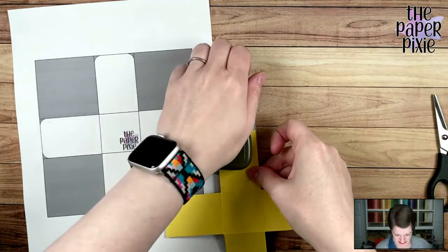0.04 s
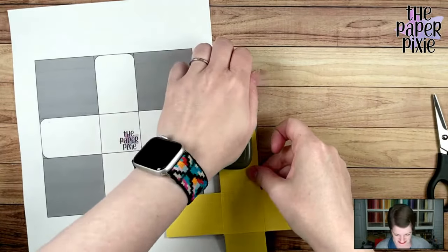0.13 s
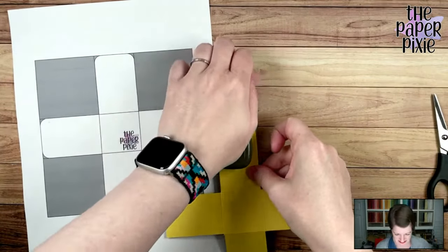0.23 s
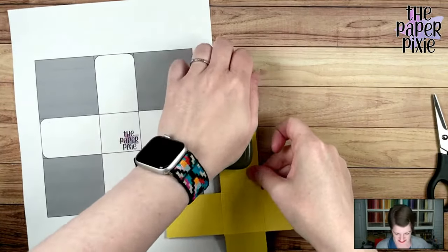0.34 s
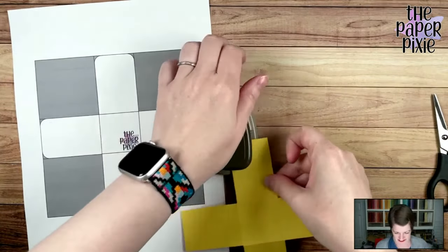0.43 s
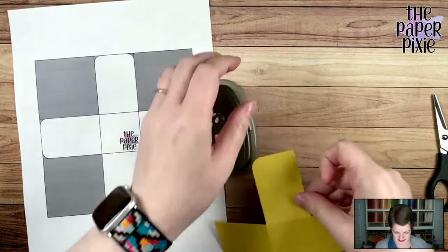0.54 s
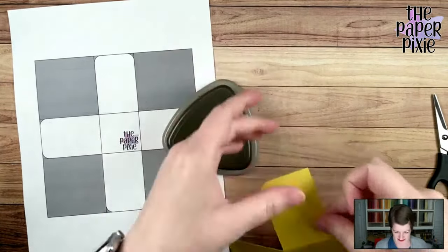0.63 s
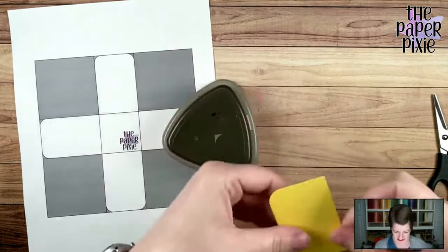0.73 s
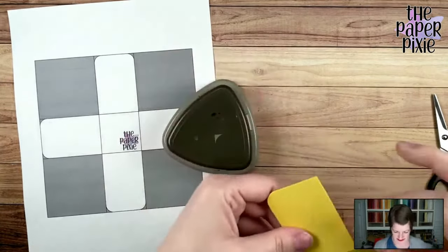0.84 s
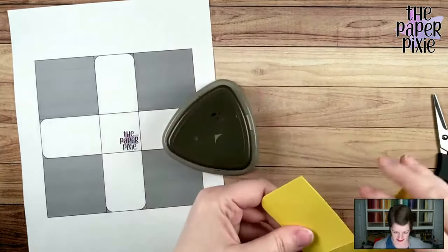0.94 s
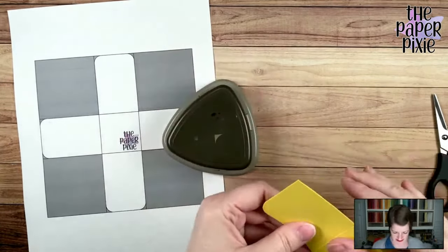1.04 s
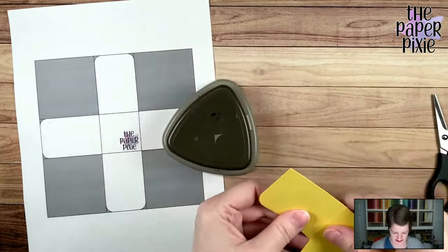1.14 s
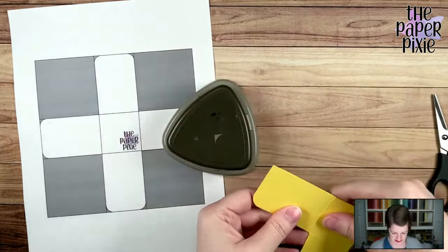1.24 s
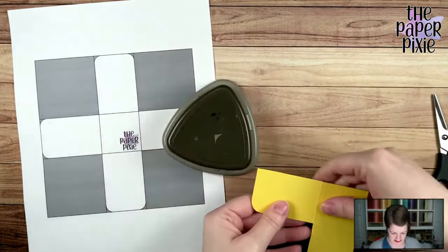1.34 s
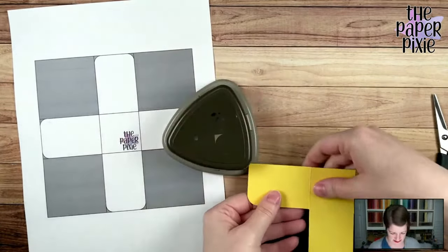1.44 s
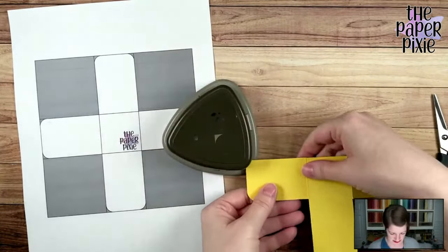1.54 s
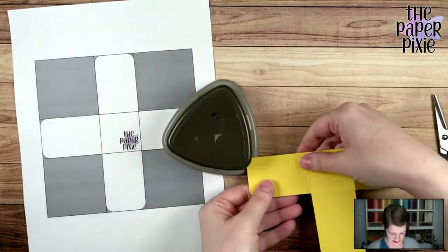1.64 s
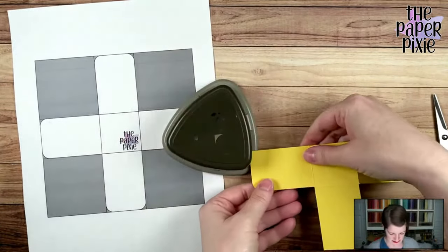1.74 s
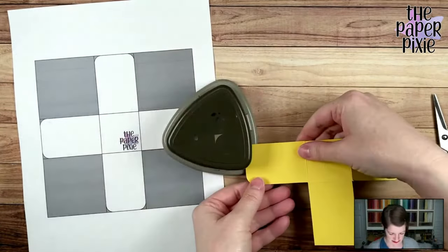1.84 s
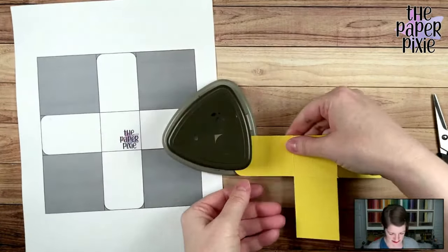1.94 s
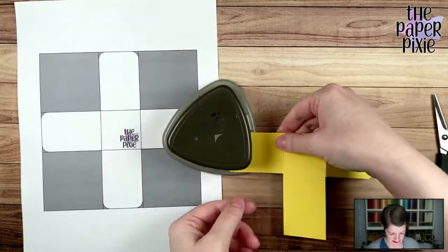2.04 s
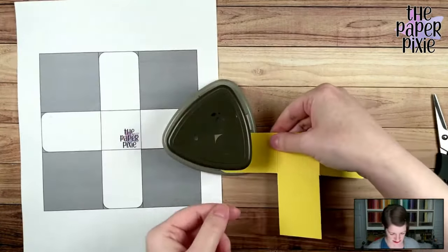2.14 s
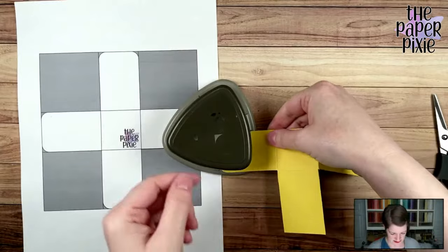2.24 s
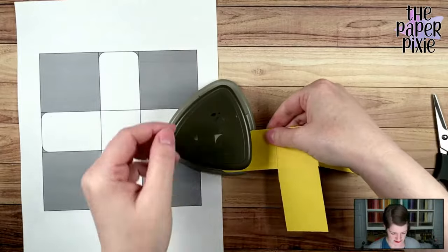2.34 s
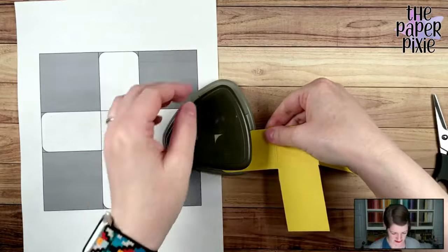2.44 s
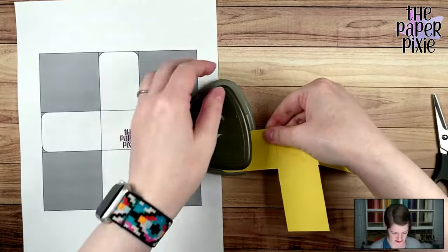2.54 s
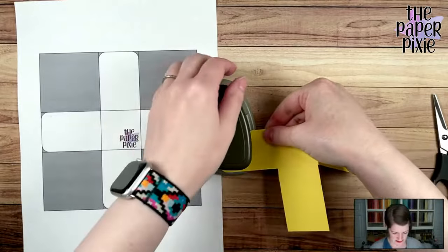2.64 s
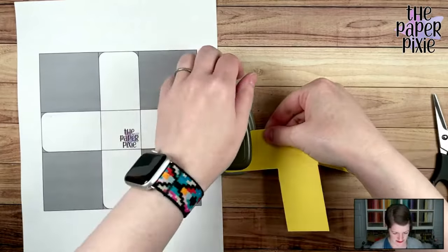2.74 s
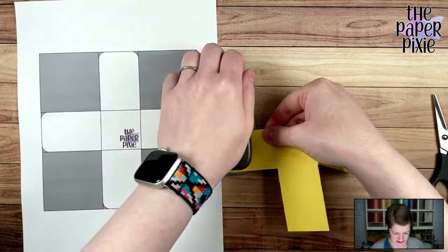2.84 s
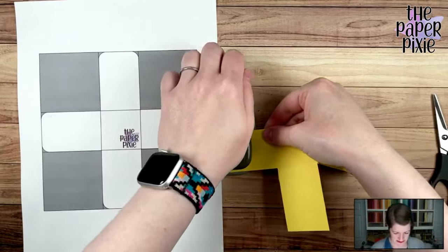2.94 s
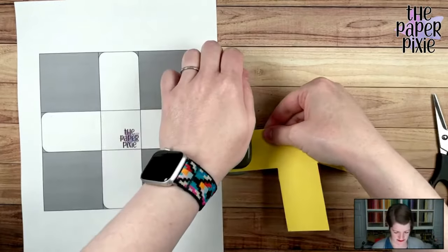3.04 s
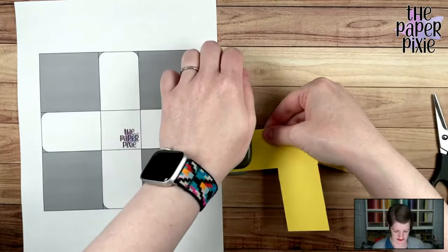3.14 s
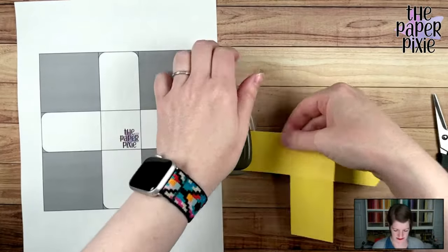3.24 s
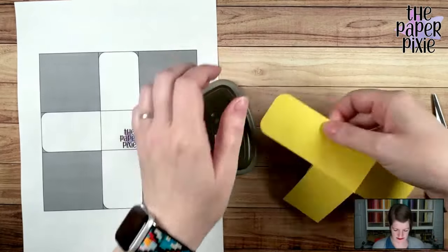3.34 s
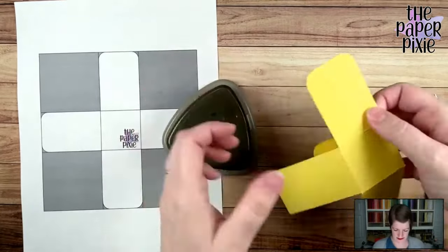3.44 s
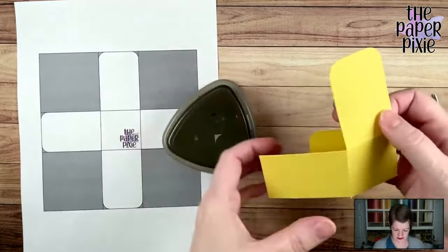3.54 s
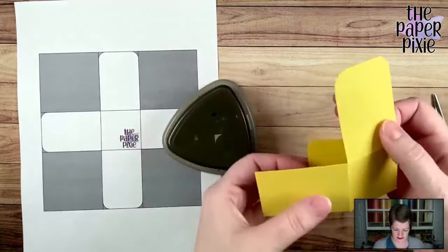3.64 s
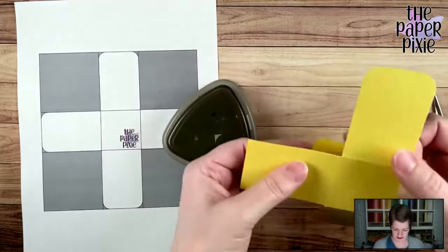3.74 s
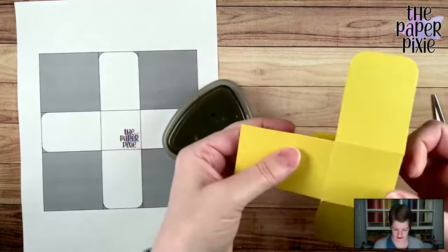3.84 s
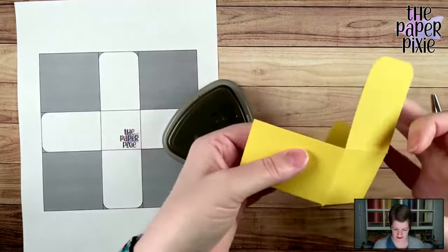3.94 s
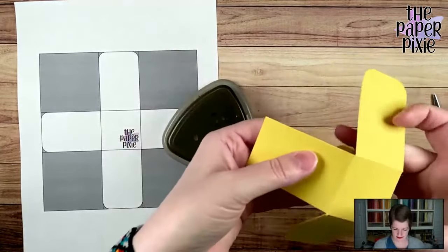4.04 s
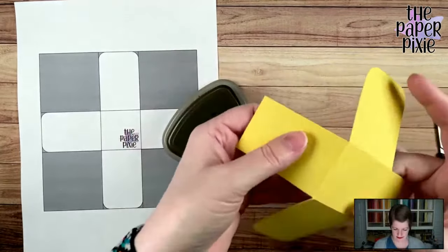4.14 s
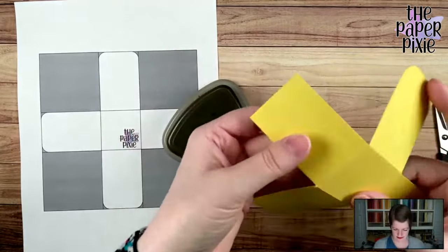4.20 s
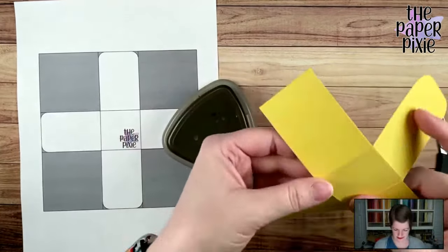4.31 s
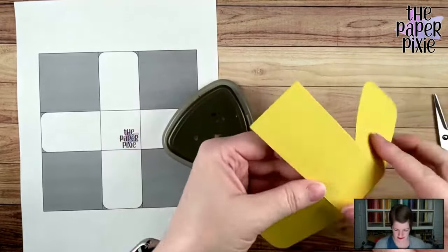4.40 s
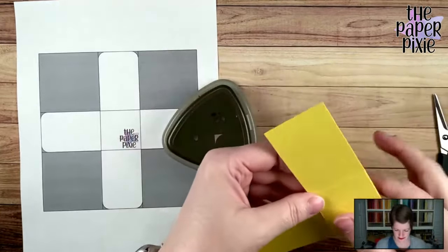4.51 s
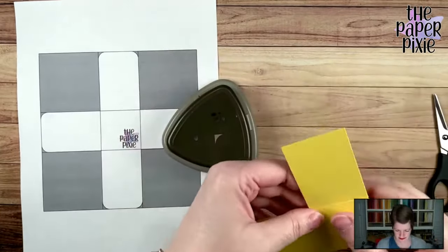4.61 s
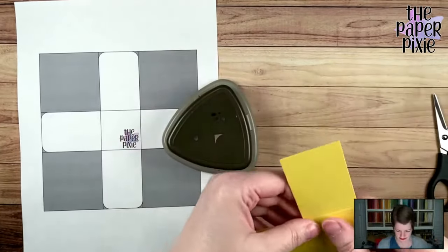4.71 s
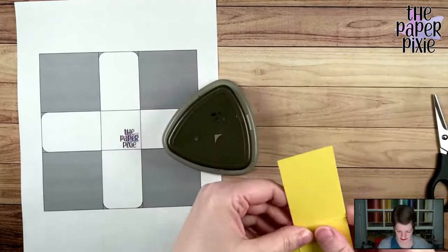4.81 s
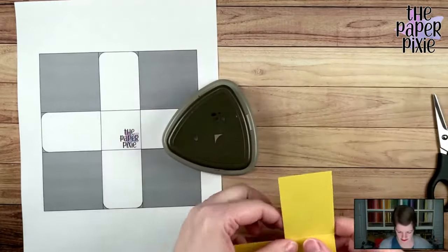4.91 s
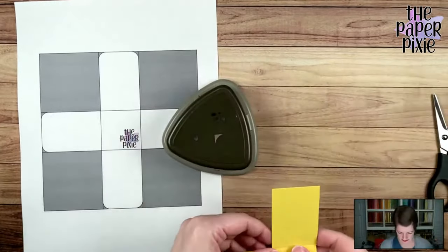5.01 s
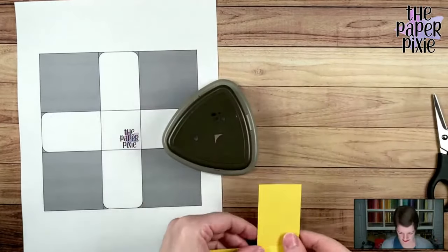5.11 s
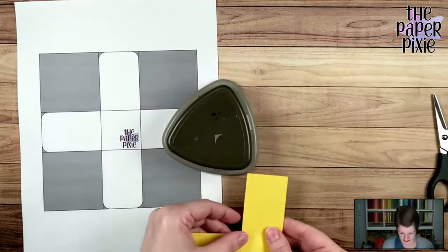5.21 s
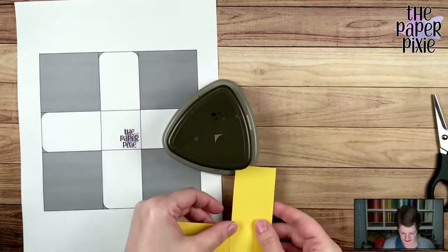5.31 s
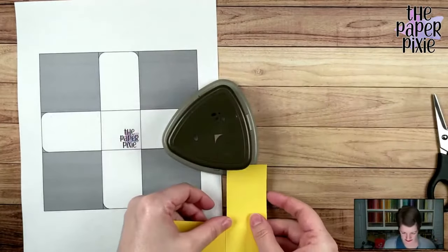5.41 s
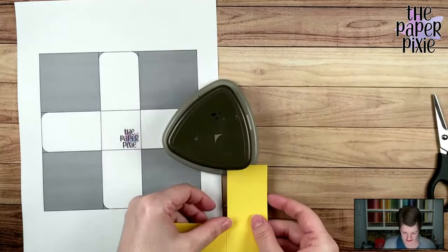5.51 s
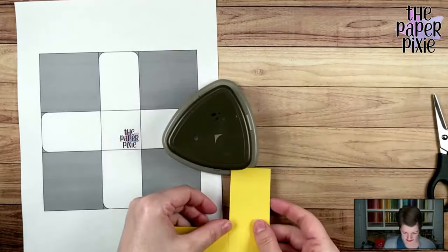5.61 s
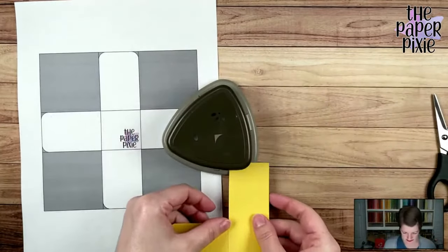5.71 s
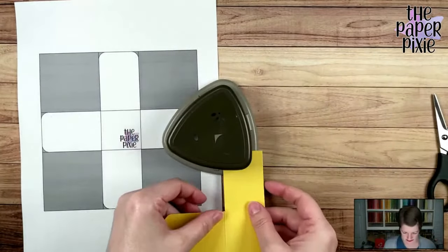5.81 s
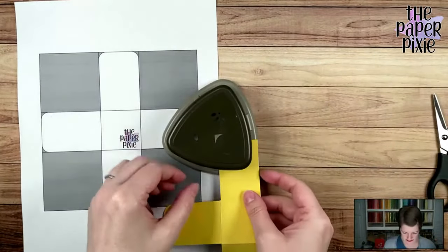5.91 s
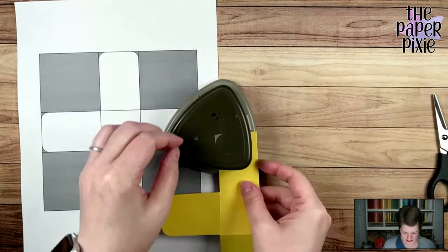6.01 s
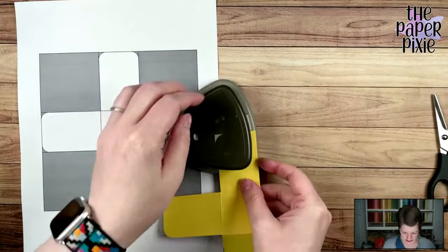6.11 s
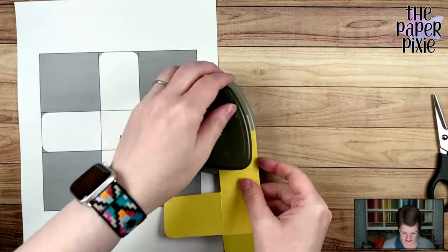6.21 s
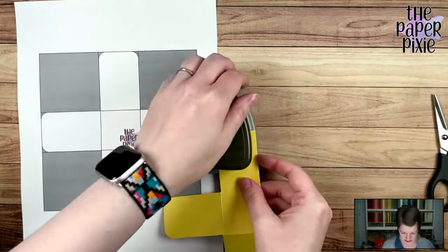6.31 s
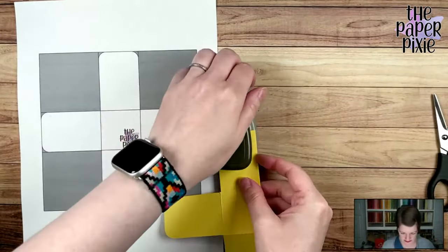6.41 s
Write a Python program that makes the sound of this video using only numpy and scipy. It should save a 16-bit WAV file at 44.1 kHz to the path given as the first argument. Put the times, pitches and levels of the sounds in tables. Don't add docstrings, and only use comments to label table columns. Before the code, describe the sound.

Two heavy, crunching punch presses thud into a wooden table about three seconds apart, with stiff card tapping, flicking and sliding between and after.

```python
import sys
import numpy as np
from scipy import signal
from scipy.fft import rfft, irfft
from scipy.io import wavfile
from scipy.ndimage import uniform_filter1d

SR = 44100
rng = np.random.default_rng(int(sys.argv[2]) if len(sys.argv) > 2 else 0)


def volts_from_decibels(level):
    exponent = np.asarray(level, float) / 20
    return 10 ** exponent


def put_to_file(sound):
    columns = np.atleast_2d(sound).T
    safe = np.clip(columns, -1, 1)
    whole_steps = np.round(safe * 32767)
    wavfile.write(sys.argv[1], SR, whole_steps.astype(np.int16))


N = 284709

# f/Hz, level per hertz/dB
HUSH_SPECTRUM = [(12, -33.5), (20, -6.5), (113, -7), (210, -12), (241, -7.5), (328, -11.5), (485, -13),
                 (558, -12.5), (738, -28.5), (1570, -22.5), (4060, -28.5), (12800, -29), (16000, -30)]
# f/Hz, T60/s
ROOM_DECAY = [(100, 0.23), (400, 0.35), (1200, 0.31), (3500, 0.31), (8000, 0.29), (15000, 0.077)]
# f/Hz, level/dB
ROOM_COLOUR = [(200, 7.5), (1500, -2), (4000, -4.5), (9000, -2.5), (15000, -6.5)]
# t of widest swing/s, level/dB
SWAYS = [(.078, -44), (.192, -37.5), (.4, -48), (.74, -52), (1.1, -68), (1.5, -74), (2.85, -49),
         (3.008, -38), (3.22, -53.5), (3.382, -59.5), (3.574, -56), (3.784, -65), (4.06, -71.5)]
# t/s, effort level/dB, stiffness (shift towards fizz)/dB
CARD_EFFORT = [(0, -78.5, -14), (0.602, -75.5, -1), (.8, -67.5, -8), (1.004, -63.5, 0), (1.231, -69.5, 5.5),
               (1.31, -75, 2.5), (1.7, -70, -8), (1.936, -63.5, -15), (2.326, -74, -8), (2.8, -84.5, -1.5),
               (3.672, -67.5, 1), (3.9, -71, -9), (4.157, -65, 1.5), (4.71, -69, -5), (5.22, -66.5, -3.5),
               (5.5, -74.5, -6), (5.701, -67, -5.5), (6.45, -80, -5)]
# start t/s, end t/s, level/dB
LEVER_RETURNS = [
    (0.21, .37, -57),
    (3.0, 3.18, -54),
]
# t of most weight/s, level/dB, fizz share/dB
GRINDS = [
    (.12, -44.5, -10.5),
    (3.04, -47, -27.5),
]
# start t/s, end t/s, level/dB, f/Hz
STROKES = [(.838, .9, -65, 3000), (.839, .888, -66, 1060), (.965, 1.014, -67, 1120),
           (1.09, 1.126, -65, 1210), (1.812, 1.884, -64, 3170), (1.819, 1.903, -71, 522),
           (1.882, 2.035, -77, 3830), (3.812, 3.92, -72.5, 1970), (4.759, 4.82, -77, 644),
           (4.858, 4.95, -68, 6300), (5.194, 5.245, -70, 3700), (5.24, 5.27, -69, 3170),
           (5.305, 5.34, -69, 3040), (5.637, 5.934, -66, 2800), (5.64, 5.853, -69, 3800),
           (5.637, 5.76, -73, 6040), (5.76, 5.845, -69, 9400)]
# start t/s, end t/s, level/dB, f/Hz
RASPS = [(.835, .898, -56, 5370), (5.66, 5.87, -70.5, 860), (1.362, 1.482, -66.5, 7000),
         (1.767, 1.858, -64.5, 7500), (4.338, 4.38, -71, 9100), (4.856, 4.95, -66, 8800),
         (5.639, 5.86, -62, 2530), (5.789, 5.845, -63.5, 12500)]
# start t/s, end t/s, level/dB, f/Hz
SWEEPS = [(.96, 1.04, -61, 6000), (1.2, 1.29, -69, 7400), (3.025, 3.06, -44.5, 3410),
          (3.615, 3.66, -63, 8400), (3.68, 3.735, -66, 7000), (3.86, 3.92, -68.5, 6000),
          (3.96, 4.06, -57.5, 6700), (4.05, 4.2, -67, 6700), (4.64, 4.8, -59.5, 5000),
          (4.7, 4.78, -68, 8950), (5.36, 5.43, -71, 3020), (.61, .68, -64, 4000), (1.5, 1.59, -69, 5070)]
# t/s, peak level/dB, ring f/Hz, burst length/s
TAPS = [(.616, -56, 686, 0.0076), (.633, -43, 574, 0.0072), (1.089, -67, 1330, .0084),
        (1.212, -48, 745, 0.003), (1.517, -39, 1424, 0.0038), (3.454, -48, 2860, 0.018),
        (3.485, -39.5, 940, 0.0038), (3.747, -58, 1050, 0.0075), (3.997, -51, 1510, 0.007),
        (4.032, -50, 1580, 0.011), (4.231, -47, 1920, 0.024), (4.238, -46.5, 970, 0.014),
        (4.262, -44, 2610, 0.0077), (4.437, -44, 2560, 0.004), (4.748, -32.5, 1030, 0.0086),
        (4.759, -51, 766, 0.0067), (5.375, -48, 2770, 0.0077), (5.382, -36, 2020, 0.0076),
        (5.637, -50.5, 2940, .006), (5.648, -49, 2870, 0.0066), (6.108, -47.5, 2260, 0.014),
        (6.11, -49.5, 790, 0.0089), (6.126, -52, 2300, .0072)]
# t/s, peak level/dB, ring f/Hz
POPS = [(1.088, -52, 1130), (1.095, -41, 1180), (1.798, -47.5, 1190), (4.519, -50, 3420),
        (5.48, -56.5, 2640)]
# t/s, peak level/dB, ring f/Hz
FLICKS = [(.635, -41.5, 3440), (.838, -51, 6100), (1.095, -43.5, 3700), (1.517, -50, 5800),
          (1.797, -40.5, 3280), (3.486, -39.5, 2383), (3.615, -49.5, 3740), (4.238, -41.5, 2780),
          (4.749, -37.5, 5300), (5.384, -41, 2880)]
# f/Hz, level/dB, T60/s
TABLE_MODES = [(63.6, -6, .6), (93, -3, 0.16), (99.3, 0, 0.17), (119.8, -5.5, 0.17), (185.2, -4, 0.14),
               (212.5, -0.5, 0.081), (248, -11.5, 0.13), (315.5, -1, 0.12), (345, -14.5, 0.064),
               (397, -4.5, 0.09), (456, -4.5, 0.14), (600, 2.5, 0.069), (707, -5.5, 0.28)]
# t/s, peak level/dB, centre f of modes reached/Hz, damping factor
BLOWS = [(0.033, -26, 101, 0.49), (0.059, -25, 150, 2.7), (0.0703, -13.5, 300, 1.2),
         (0.0793, -19, 126, 2.1), (0.246, -32, 162, 1.7), (0.63, -47, 65, 3.6), (0.852, -46, 149, 1.1),
         (1.515, -47, 398, 2.1), (2.822, -33.5, 97, 0.16), (2.887, -5.5, 197, 1.67), (2.895, -21, 102, 1.4),
         (3.058, -29.5, 127, 1.5), (3.486, -53, 67, 1.4), (3.614, -50, 116, 2.9), (4.232, -58, 110, 0.81),
         (4.748, -47.5, 410, 1.3), (4.749, -52, 120, 2), (1.801, -57, 85, 1.1), (3.838, -50, 130, 0.9),
         (6.113, -51.5, 95.4, 1.1)]
# t/s, peak level/dB, centre f of modes reached/Hz, damping factor
REBOUNDS = [
    (0.0723, -12, 280, 1.9),
    (0.0953, -14, 174, 4.2),
    (2.864, -26, 150, 1.3),
    (2.871, -13.5, 270, 1.5),
]
# t/s, f/Hz, level/dB, T60/s
TRAY_RINGS = [
    (2.886, 248, -35.5, .56),
    (2.886, 248, -55, 1.5),
]
# t/s, peak level/dB, ring f/Hz, burst length/s
SNAPS = [(.0605, -26, 1460, 0.01), (.066, -23.5, 1330, 0.013), (.078, -18, 1910, 0.0088),
         (.085, -22, 700, 0.0088), (.092, -22.5, 1180, 0.011), (.1, -30, 800, 0.0053),
         (.331, -39.5, 2010, 0.0068), (.392, -28.5, 2110, 0.007), (.408, -39, 2170, .012),
         (2.82, -42.5, 1220, 0.014), (2.865, -35.5, 980, 0.008), (2.8845, -16.5, 1180, .0057),
         (2.899, -50, 1400, .0027), (2.903, -21, 810, 0.014), (3.058, -45, 1980, 0.0096),
         (3.064, -32.5, 875, 0.014), (3.186, -37, 1210, 0.0039)]
# t/s, peak level/dB, ring f/Hz, burst length/s
KNOCKS = [(.019, -41.5, 750, 0.012), (.033, -41, 704, 0.0061), (.243, -27, 792, .0093),
          (.251, -31, 2260, 0.013), (.291, -54, 790, 0.0076), (.394, -40, 2034, .0063),
          (2.872, -24, 1260, 0.012), (2.893, -24, 1220, 0.0081), (3.055, -29.5, 2320, 0.0092),
          (3.074, -55, 2000, 0.0099)]
# t/s, peak level/dB, ring f/Hz, burst length/s
TICKS = [(.061, -40, 9500, .006), (2.817, -48, 5940, 0.0082), (2.8695, -25.5, 3750, 0.012),
         (2.874, -17, 3320, 0.004), (2.898, -43, 5600, 0.0029), (2.912, -41, 3270, .028),
         (2.94, -40, 3040, 0.023), (3.024, -38, 4650, .0056), (3.138, -37, 4500, 0.0078),
         (3.148, -38, 4620, 0.032), (3.187, -36, 4000, 0.0079)]
# t/s, peak level/dB, ring f/Hz
PINGS = [
    (.0782, -23.5, 6200),
    (.392, -35, 6260),
    (2.884, -23.5, 8900),
    (3.042, -46, 3700),
]


def evened(x):
    return x / np.sqrt(np.mean(x ** 2) + 1e-20)


def read(points, hz):
    f, value = np.transpose(points)
    return np.interp(np.log(hz + 1), np.log(f + 1), value)


def add(mix, s, sound):
    part = mix[max(round(s * SR), 0):][:len(sound)]
    part += sound[:len(part)]


def band(x, lo_hz, hi_hz):
    sos = signal.butter(2, [lo_hz, min(hi_hz, SR / 2.2)], "band", fs=SR, output="sos")
    return signal.sosfilt(sos, x)


def resonate(x, hz, width):
    turn = np.exp(2j * np.pi * np.cumsum(hz * np.ones(len(x))) / SR)
    r = np.exp(-np.pi * width / SR)
    return 2 * (turn * signal.lfilter([1 - r], [1, -r], x / turn)).real


def swell(start, end, db, rise_db_per_s, fall_db_per_s):
    t = np.arange(N) / SR
    before, after = np.maximum(start - t, 0), np.maximum(t - end, 0)
    return volts_from_decibels(db - rise_db_per_s * before - fall_db_per_s * after)


def hush():
    hz = np.fft.rfftfreq(N, 1 / SR)
    spectrum = rfft(rng.standard_normal(N)) * volts_from_decibels(read(HUSH_SPECTRUM, hz))
    return volts_from_decibels(-70) * evened(irfft(spectrum, N))


def room(x):
    echoes = np.zeros(SR // 2)
    at = np.arange(120, len(echoes) - 20, 20)
    echoes[at + rng.integers(0, 20, len(at))] = rng.choice([-1., 1.], len(at))
    hz, t, z = signal.stft(echoes, SR, nperseg=256)
    z *= volts_from_decibels(read(ROOM_COLOUR, hz)[:, None] - 60 * t / read(ROOM_DECAY, hz)[:, None])
    tail = signal.istft(z, SR, nperseg=256)[1]
    early_power = np.sum(echoes[:SR // 40] ** 2)
    return signal.fftconvolve(x, tail / np.sqrt(early_power))[:N]


def sway():
    level = sum(swell(s, s, db, rise_db_per_s=257, fall_db_per_s=85.5) for s, db in SWAYS)
    return np.sqrt(2) * level * np.sin(2 * np.pi * 26.4 * np.arange(N) / SR)


def patchy(x, patchy_db):
    z = signal.stft(x, nperseg=512, noverlap=384)[2]
    patches = uniform_filter1d(rng.standard_normal(z.shape), size=9, axis=0)
    patches = uniform_filter1d(patches, size=14, axis=1)
    return signal.istft(z * volts_from_decibels(patchy_db * evened(patches)), nperseg=512, noverlap=384)[1][:N]


def lever_gain():
    return sum(swell(*row, rise_db_per_s=101, fall_db_per_s=209) for row in LEVER_RETURNS)


def grind_gains():
    dull, fizz = np.zeros((2, N))
    for s, db, fizz_db in GRINDS:
        gain = swell(s, s, db, rise_db_per_s=127.5, fall_db_per_s=73.5)
        dull += gain
        fizz += volts_from_decibels(fizz_db) * gain
    return dull, fizz


def rubbing():
    s, *columns = np.transpose(CARD_EFFORT)
    effort_db, stiff_db = (np.interp(np.arange(N) / SR, s, c) for c in columns)
    lever = lever_gain()
    grind, grind_fizz = grind_gains()
    sheet_gain = volts_from_decibels(effort_db) + lever
    fizz_gain = volts_from_decibels(effort_db + stiff_db) + volts_from_decibels(-14) * lever + grind_fizz
    drag_gain = volts_from_decibels(-72.5 + 0.5 * (effort_db - effort_db.mean())) + grind
    grains = rng.standard_normal((3, N)) * volts_from_decibels(1.74 * rng.exponential(1, N))
    rub = volts_from_decibels(-2.5) * sheet_gain * evened(band(grains[0], 1300, 5200))
    rub += volts_from_decibels(-4.0) * fizz_gain * evened(band(grains[1], 5000, 9960))
    rub += volts_from_decibels(-1.7) * drag_gain * evened(band(grains[2], 160, 1256))
    return patchy(rub, 1.8)


def strokes(rows, width_share, soft):
    out = np.zeros(N)
    for start, end, db, hz in rows:
        width = width_share * hz
        noise, slips = rng.standard_normal((2, SR // 2))[:, :round((end - start) * SR)]
        stutter = volts_from_decibels(3.1 * evened(uniform_filter1d(slips, size=250)))
        scrape = resonate(noise * abs(noise) * stutter, hz, width)
        scrape = resonate(scrape, hz, 2 * width)
        stroke = signal.windows.tukey(len(scrape), soft) * np.linspace(1.15, .75, len(scrape))
        add(out, start, volts_from_decibels(db) * evened(scrape) * stroke)
    return out


def click(db, hz, bright_db, length, ring_db, sharp, spread):
    t = np.arange(4096) / SR
    length = np.clip(length, .001, .03)
    contacts = rng.standard_normal(len(t)) * volts_from_decibels(2.5 * rng.exponential(1, len(t)))
    contacts *= (t / length) ** 1.3 * np.exp(-4 * t / length)
    crack = band(contacts, hz / spread, hz * spread)
    edge = band(contacts, 4100, 12980)
    ring = resonate(contacts, hz, hz / sharp)
    body = evened(crack) + volts_from_decibels(ring_db) * evened(ring)
    return volts_from_decibels(db) * (body / abs(body).max() + volts_from_decibels(bright_db) * edge / abs(edge).max())


def clicks(rows, bright_db, ring_db, sharp, spread, length=None):
    out = np.zeros(N)
    for s, db, hz, *own in rows:
        add(out, s - .0005, click(db, hz, bright_db, length or own[0], ring_db, sharp, spread))
    return out


def card_contacts():
    card = clicks(TAPS, bright_db=-16, ring_db=-7, sharp=9, spread=2.2)
    card += clicks(POPS, bright_db=-9.5, ring_db=25, sharp=9, spread=2.2, length=.00527)
    card += clicks(FLICKS, bright_db=-11, ring_db=0, sharp=8, spread=1.7, length=.0052)
    card += strokes(STROKES, width_share=.09, soft=.3)
    card += strokes(RASPS, width_share=.6, soft=.3)
    card += strokes(SWEEPS, width_share=.6, soft=1)
    return card


def mode(hz, db, t60, seconds=0.92):
    t = np.arange(round(seconds * SR)) / SR
    return volts_from_decibels(db - 60 * t / max(t60, .01)) * np.sin(2 * np.pi * hz * t)


def thud(centre_hz, damping):
    out = 0
    for hz, db, t60 in TABLE_MODES:
        reach_db = -5.0 * np.log2(hz / centre_hz) ** 2
        out = out + mode(hz, db + reach_db, t60 / damping, .7)
    return out / abs(out).max()


def table_top():
    out = np.zeros(N)
    for rows, way in ((BLOWS, 1), (REBOUNDS, -1)):
        for s, db, centre_hz, damping in rows:
            add(out, s, way * volts_from_decibels(db) * thud(centre_hz, damping))
    for s, hz, db, t60 in TRAY_RINGS:
        add(out, s, mode(hz, db, t60))
    padded = uniform_filter1d(out, size=30)
    return band(padded, 100, 3000)


def corner_punch():
    punch = clicks(SNAPS, bright_db=-14, ring_db=-5, sharp=11, spread=2.6)
    punch += clicks(KNOCKS, bright_db=-28, ring_db=7, sharp=11, spread=2.6)
    punch += clicks(TICKS, bright_db=-9, ring_db=-17, sharp=9, spread=1.5)
    punch += clicks(PINGS, bright_db=-1.5, ring_db=10, sharp=9, spread=1.5, length=.0043)
    return punch


def scene():
    card, wood, punch = card_contacts(), table_top(), corner_punch()
    wet = room(volts_from_decibels(-2.0) * punch + volts_from_decibels(-1) * card + volts_from_decibels(-7.5) * wood)
    return (hush() + sway() + rubbing() + card + wood + punch + wet)[None]


def roll_off(x):
    return signal.sosfilt(signal.butter(12, 16640, fs=SR, output="sos"), x)


def record(dry):
    def low(hz):
        taps = signal.firwin(511, hz, window=("kaiser", 9), fs=SR)
        return signal.oaconvolve(dry, taps[None], "same")

    power = uniform_filter1d(dry ** 2, size=512)
    loud = uniform_filter1d(1. * (power > volts_from_decibels(2 * -33)), size=256)
    quiet = low(15850)
    mix = quiet + loud * (low(16400) - quiet)
    return roll_off(mix)


dry = scene()
out = record(dry)
put_to_file(out)
```